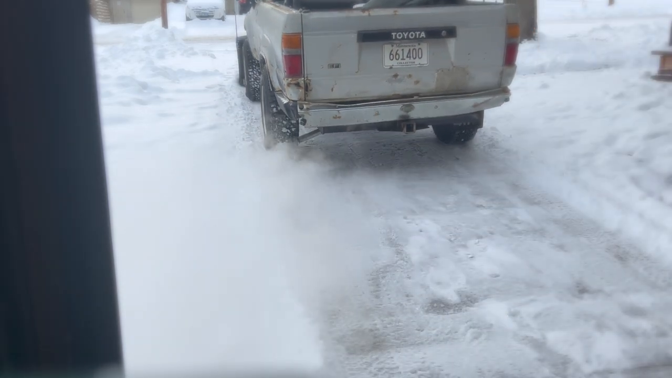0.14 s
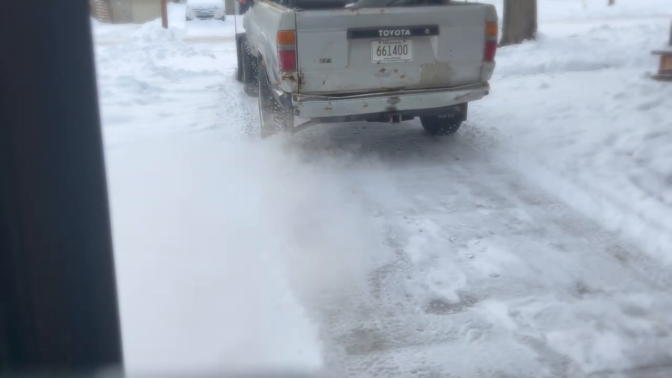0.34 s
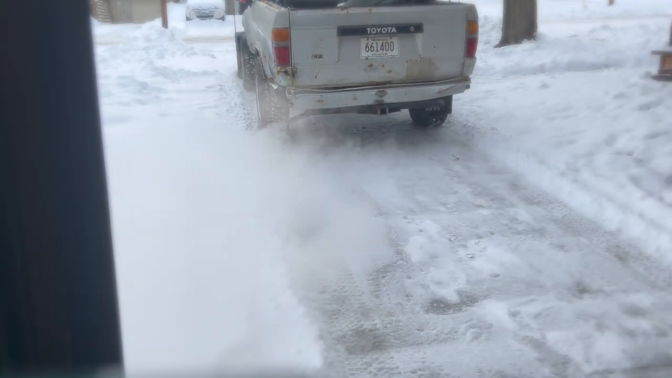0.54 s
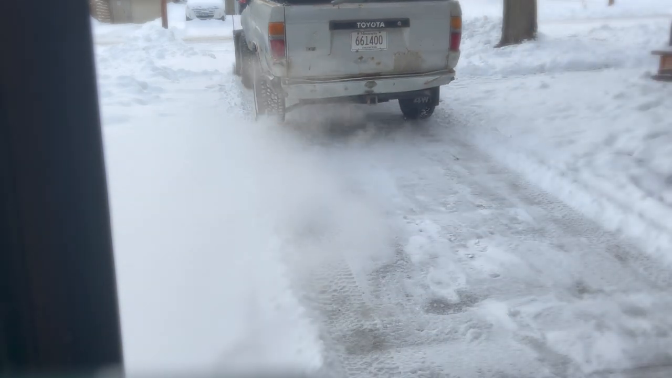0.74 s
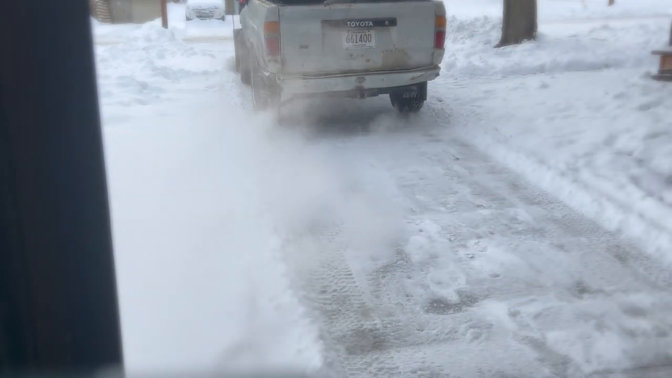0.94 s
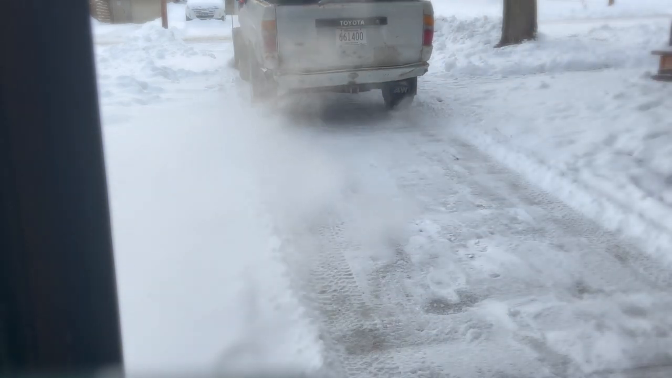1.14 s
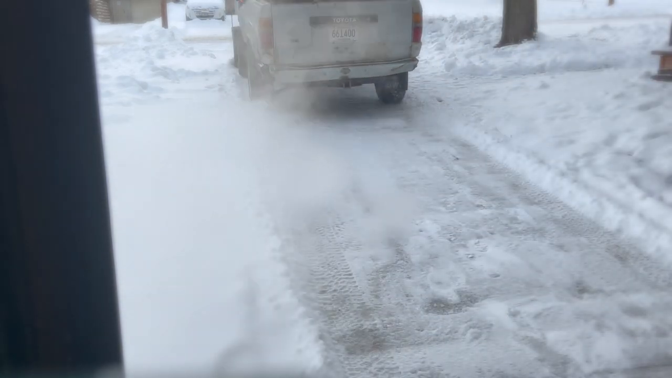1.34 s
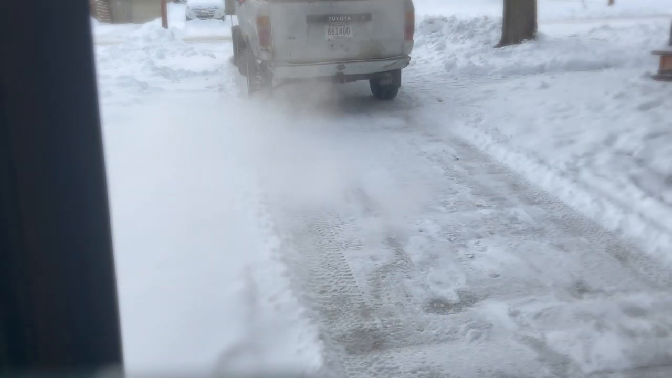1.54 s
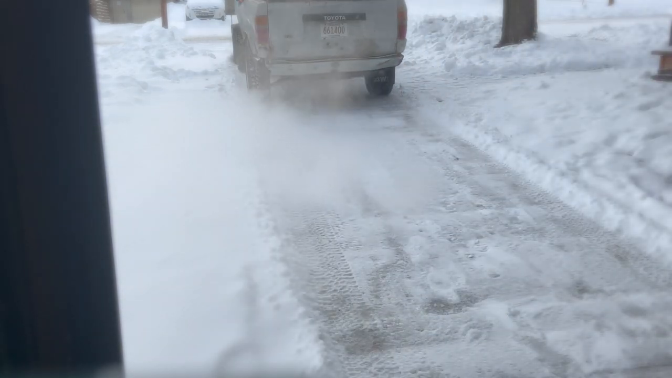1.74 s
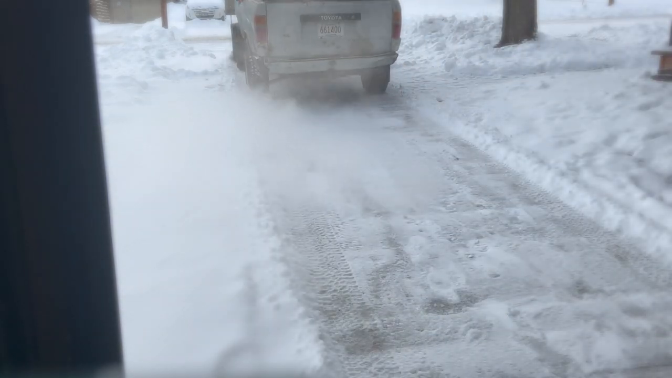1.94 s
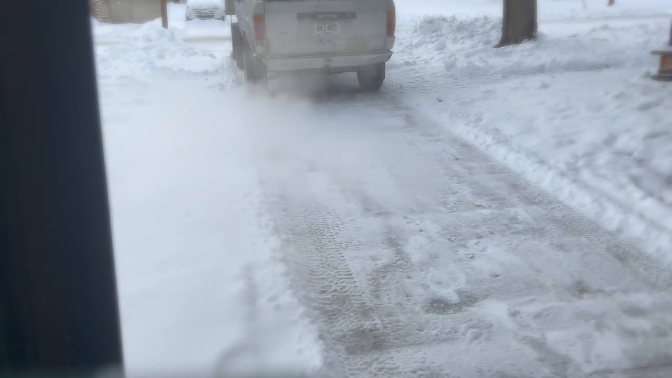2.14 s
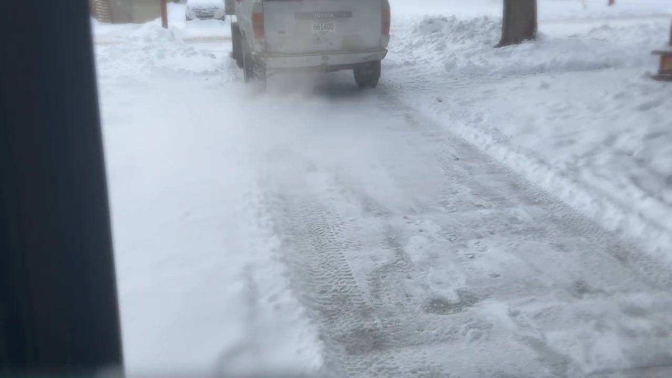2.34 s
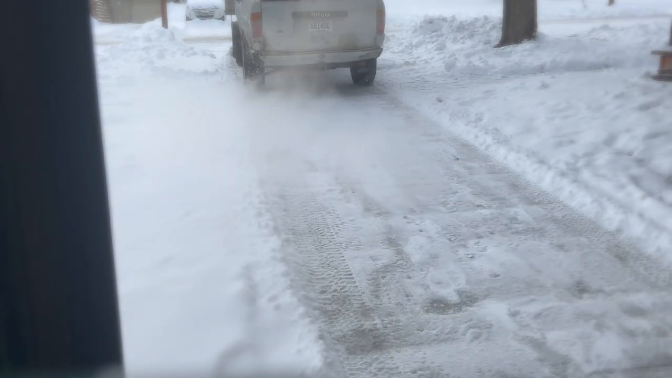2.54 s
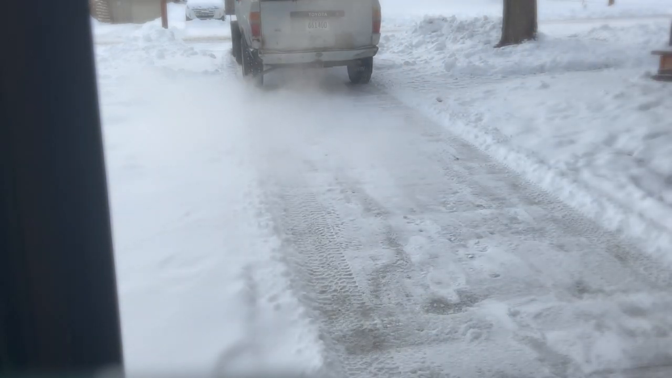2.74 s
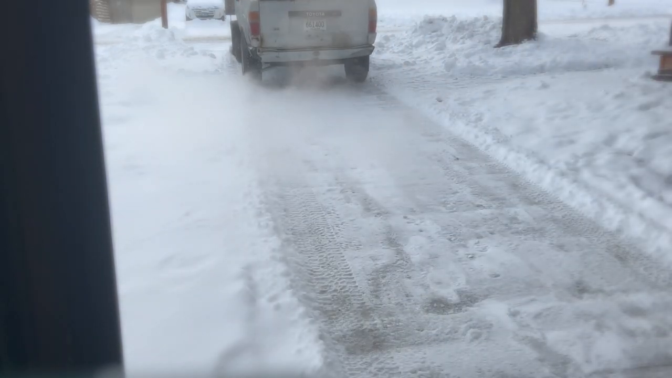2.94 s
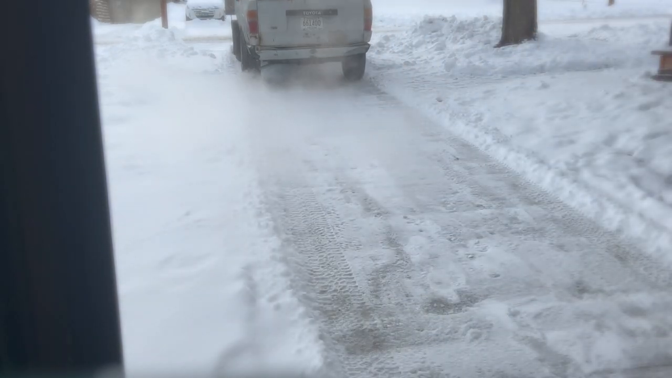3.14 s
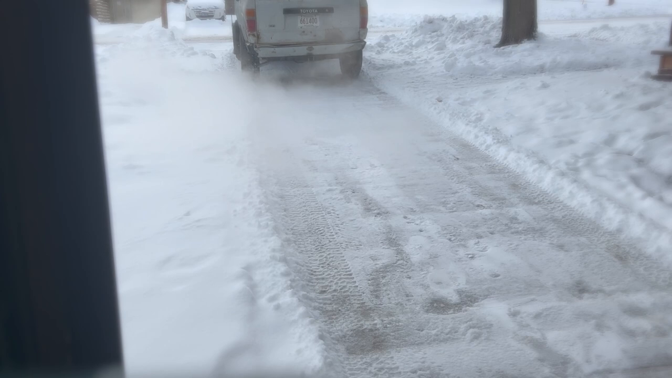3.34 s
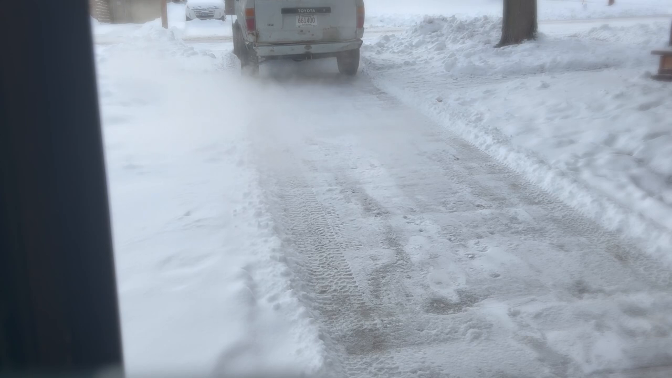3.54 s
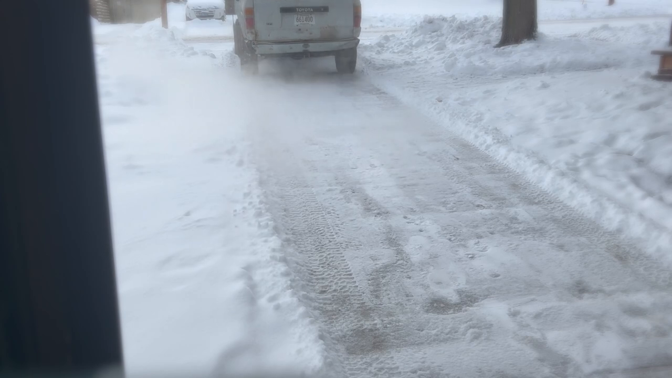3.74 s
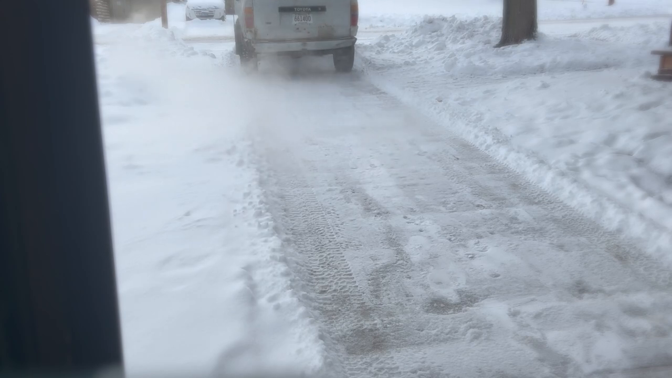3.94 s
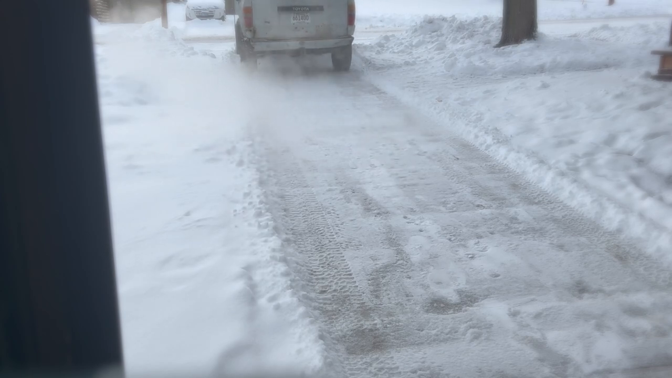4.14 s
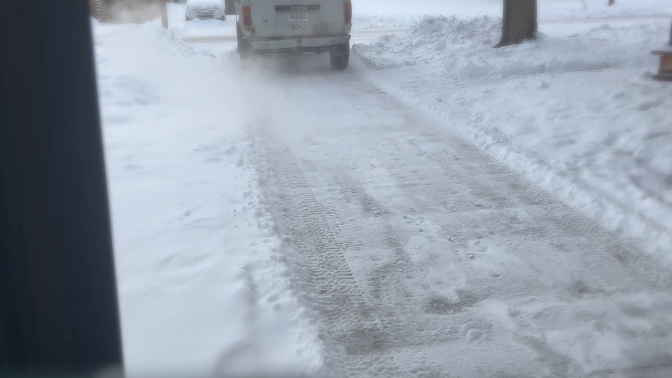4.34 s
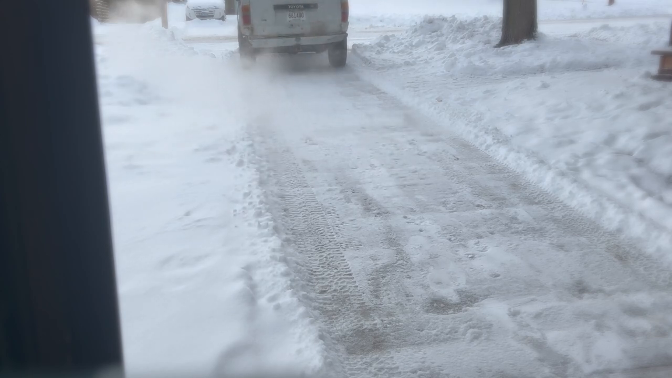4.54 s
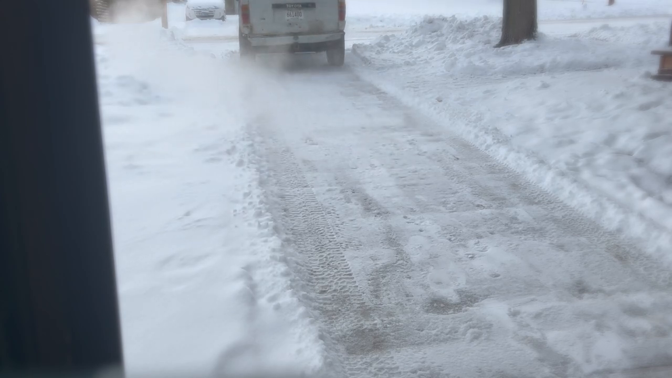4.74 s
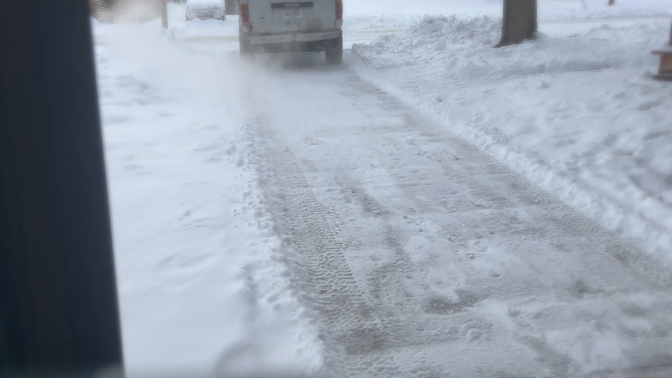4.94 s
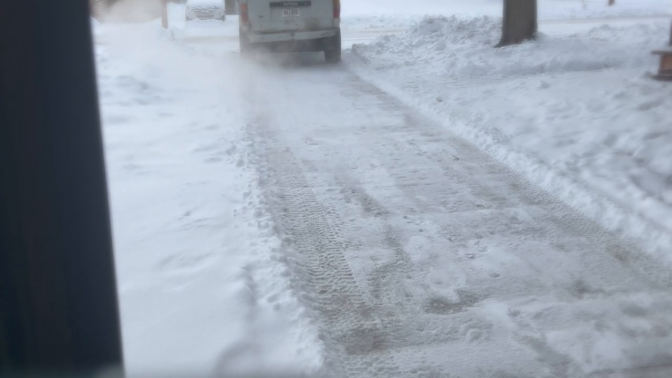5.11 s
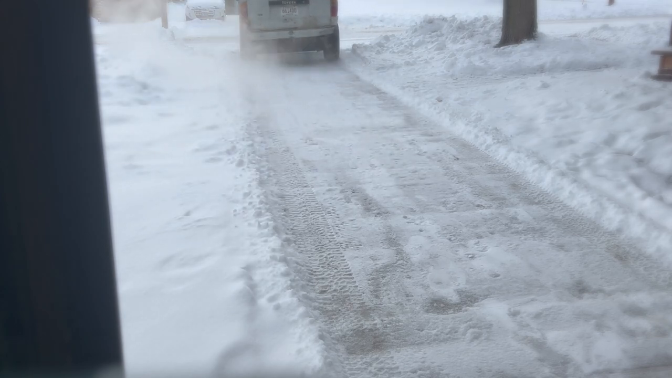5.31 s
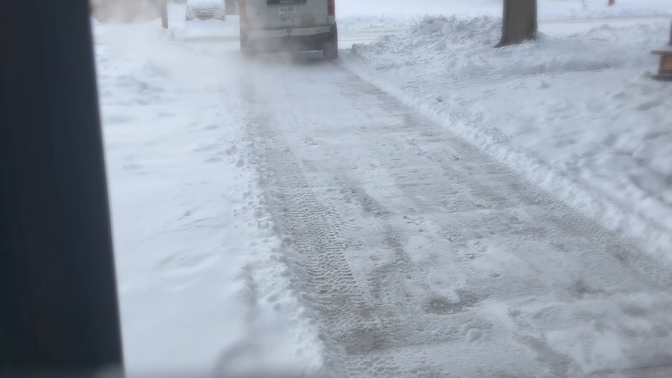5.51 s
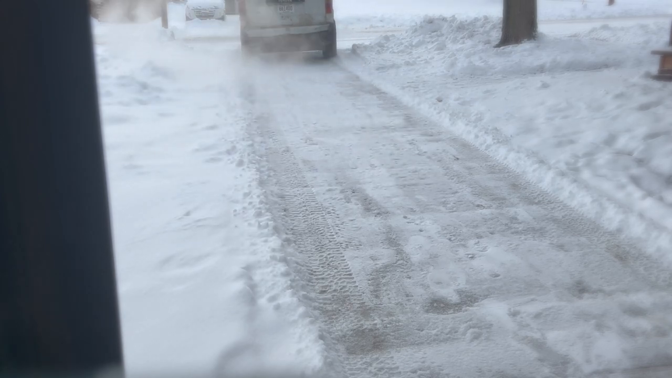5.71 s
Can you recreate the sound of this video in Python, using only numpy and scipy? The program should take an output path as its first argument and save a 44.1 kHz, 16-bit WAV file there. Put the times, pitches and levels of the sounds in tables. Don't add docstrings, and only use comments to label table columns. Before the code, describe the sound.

A small four-cylinder engine knocks and hums through its exhaust, briefly bogs down, then pulls again at a lower pitch than at first. Snow crumbles under the tyres in irregular patches while the load bed knocks and the body bounces. Open snowy driveway, close handheld stereo microphone, dry sound with soft hiss from gas and fan.

```python
import sys
import numpy as np
from scipy import signal
from scipy.fft import rfft, irfft, next_fast_len
from scipy.io import wavfile
from scipy.ndimage import uniform_filter1d

SR = 44100
rng = np.random.default_rng(int(sys.argv[2]) if len(sys.argv) > 2 else 0)


def master_out(mix):
    frames = np.transpose(np.atleast_2d(mix))
    ceiling = np.clip(frames, -1, 1)
    pcm = np.round(ceiling * 32767).astype(np.int16)
    wavfile.write(sys.argv[1], SR, pcm)


def to_linear_factor(level_db):
    exponent = np.asarray(level_db, float) / 20
    return 10 ** exponent


N = 254456
SIZE = next_fast_len(N)
TIME = np.arange(N) / SR
FREQ = np.fft.rfftfreq(SIZE, 1 / SR)
MID_LOAD_DB = -53


def curves(table):
    s, *columns = np.transpose(table)
    return [np.interp(TIME, s, c) for c in columns]


def unit(x):
    return x / np.sqrt(np.mean(x ** 2))


def noise():
    return rng.standard_normal((2, N))


def colour(x, spectrum):
    hz, db = np.transpose(spectrum)
    gain = to_linear_factor(np.interp(np.log(FREQ + 1), np.log(hz), db))
    return irfft(rfft(x, SIZE) * gain, SIZE)[..., :N]


def ring(x, hz, width_hz):
    return signal.lfilter(*signal.iirpeak(hz, hz / width_hz, fs=SR), x)


def modes(x, table):
    return sum(to_linear_factor(db) * ring(x, hz, width_hz) for hz, width_hz, db in table)


def walk(rate):
    hold = int(SR / rate)
    steps = np.repeat(rng.standard_normal(N // hold + 1), hold)
    return unit(uniform_filter1d(uniform_filter1d(steps, hold), hold)[:N])


def burst(s, decay_s, rise_s):
    span = slice(int(s * SR), min(int((s + .3) * SR), N))
    age = np.maximum(TIME[span] - s, 0)
    return span, age, (1 - np.exp(-age / rise_s)) * np.exp(-age / decay_s)


def rings(table, rise_s, gain_db, decay_s):
    out = np.zeros((2, N))
    for s, db, hz in table:
        span, age, shape = burst(s, decay_s, rise_s)
        out[0, span] += to_linear_factor(db + gain_db) * shape * np.sin(2 * np.pi * hz * age)
    return out


def swells(rows):
    return sum(to_linear_factor(db) * np.exp(-2 * ((TIME - s) / max(length_s, .01)) ** 2) for s, db, length_s in rows)


# centre in seconds, level in dB,
# length in seconds.
PANEL_SQUEAKS = [(.06, -54, 0.11), (.172, -45.5, 0.019), (.198, -44, 0.015), (.27, -56, .012),
                 (.35, -58, .07), (.55, -59, 0.24), (4.82, -60, .1)]
# start in seconds, peak in dB, pitch in Hz.
ENGINE_PINGS = [(.138, -43, 2200), (.402, -43, 2900), (.492, -41, 2050), (.622, -45, 2980), (.8, -36, 2890),
                (2.6702, -45, 3110), (2.6963, -53.5, 2930), (2.7457, -45, 2870), (2.796, -42, 2890),
                (2.8189, -40, 3040), (2.8439, -46, 2180), (2.8938, -44, 3090), (3.167, -42, 2920),
                (4.509, -45, 2200), (5.0557, -45, 2200)]
# start in seconds, peak in dB, pitch in Hz.
BED_KNOCKS = [(1.461, -38, 470), (1.613, -41, 500), (2.877, -42, 557), (3.119, -50, 453), (3.173, -38, 633),
              (3.388, -34, 390), (3.615, -41, 693), (4.198, -44, 427)]
# start in seconds, peak in dB, pitch in Hz.
BODY_BOUNCES = [(0.164, -41, 75.4), (0.27, -45, 136), (0.309, -45, 76), (0.34, -35, 136), (0.669, -31, 76),
                (1.598, -23.5, 62.5), (2.199, -29, 75.4), (2.579, -42, 72), (2.719, -21, 73),
                (3.12, -30, 61.6), (3.17, -32, 70), (3.849, -35, 72.84), (4.209, -49, 75.8),
                (4.259, -21, 63.5), (4.289, -20, 64), (4.389, -43, 74.6), (4.719, -36, 71)]


def rattles():
    hz, width_hz = 1030, 24
    rough = unit(ring(ring(noise(), hz, width_hz), hz, width_hz))
    note = np.sin(2 * np.pi * hz * TIME + 0.49 * walk(27.7))
    song = to_linear_factor(-5) * rough + [[np.sqrt(2)], [0]] * note
    pings = rings(ENGINE_PINGS, rise_s=0.00076, gain_db=1.6, decay_s=0.005)
    knocks = rings(BED_KNOCKS, rise_s=0.00055, gain_db=-0.7, decay_s=0.014)
    bounces = rings(BODY_BOUNCES, rise_s=0.016, gain_db=-1.2, decay_s=0.023)
    return swells(PANEL_SQUEAKS) * song + pings + knocks + bounces


# start in seconds, peak in dB, ring in Hz.
WHEEL_DROPS = [(0.154, -24, 214), (0.321, -40, 180), (0.411, -44, 178), (0.553, -38, 248),
               (0.594, -35, 251), (1.068, -32, 210), (2.154, -29.5, 244.8), (2.456, -34, 188.9),
               (2.594, -26, 232), (2.876, -39, 241), (3.106, -28, 187), (3.236, -23, 192),
               (3.381, -30, 177.6), (3.495, -30, 205), (3.543, -35, 204.3), (3.589, -29.5, 272),
               (3.977, -29.5, 208.3), (4.198, -28.5, 276), (4.25, -26.5, 180), (4.664, -29.5, 265),
               (4.764, -31, 214), (4.84, -27, 178), (4.901, -33, 208), (4.969, -26.5, 213),
               (5.365, -27, 207), (5.551, -29, 242), (5.672, -25, 252)]


def bumps():
    out = np.zeros((2, N))
    hiss = unit(colour(noise(), SNOW_COLOUR))
    thump_hz = BODY_MODES[0][0]
    for s, db, hz in WHEEL_DROPS:
        span, age, crack = burst(s, .022, 0.021)
        ringing = burst(s, 0.011, 0.01)[2] * np.sin(2 * np.pi * hz * age)
        thump = burst(s, 0.025, 0.006)[2] * np.sin(2 * np.pi * thump_hz * age)
        out[:, span] += to_linear_factor(db - 6.0) * crack * hiss[:, span]
        out[0, span] += to_linear_factor(db + 2.0) * ringing + to_linear_factor(db - 27) * thump
    return out


# time in seconds, level in dB.
SNOW_DEPTH = [(0, -44), (.9, -45.5), (1.55, -51), (2.35, -53), (3.3, -46), (4.1, -55.5), (4.5, -54),
              (5, -47), (5.77, -44)]
# centre in seconds, crunch in dB, length in seconds,
# rumble minus crunch in dB.
CRUST_PATCHES = [(0.024, -52.5, 0.097, 6), (0.17, -62, 0.087, 13), (.34, -55.5, 0.059, 16.5),
                 (0.583, -58, 0.094, 3), (0.957, -56, 0.049, 9), (1.112, -66.5, 0.14, 23),
                 (1.414, -64.5, 0.12, 16), (1.62, -59, 0.021, -7), (2.2, -56, 0.075, 9),
                 (2.582, -46.5, 0.15, 2), (2.878, -53, 0.04, -11), (3.127, -53.5, 0.04, 9),
                 (3.28, -66, 0.054, 15), (3.39, -54, 0.12, 7), (3.502, -44.5, 0.02, -3),
                 (3.645, -49, 0.081, 4), (3.794, -57, 0.079, 7), (3.9, -48, 0.069, 5),
                 (3.97, -66, 0.055, 19), (4.208, -51, 0.019, 11), (4.284, -44.5, 0.066, 3),
                 (4.62, -55, 0.069, 8.5), (4.772, -61, 0.054, 21), (4.88, -51.5, 0.046, 7.5),
                 (5.125, -61.5, 0.13, 15.5), (5.36, -55.5, 0.13, 13.5), (5.585, -56, 0.041, 11),
                 (5.737, -53, 0.089, -2)]


def crush():
    depth_db, = curves(SNOW_DEPTH)
    crunch = swells([(s, db, length_s) for s, db, length_s, _ in CRUST_PATCHES])
    rumble = swells([(s, db + low_db, length_s) for s, db, length_s, low_db in CRUST_PATCHES])
    return to_linear_factor(depth_db) + crunch, to_linear_factor(depth_db + 2.5) + rumble


# pitch in Hz, level in dB.
SNOW_COLOUR = [(25, -28), (45, 4), (125, -0.5), (160, -4.5), (220, -1.5), (340, -14.5), (550, -8.5),
               (780, -14), (1050, -13), (1350, -16.5), (1650, -31), (4000, -26), (16000, -47.5)]
# pitch in Hz, width in Hz, level in dB.
BODY_MODES = [(67.9, 15.6, 6), (105.2, 20.4, 0.5), (187, 9.2, -4), (220, 21.3, -9), (268, 47, -16.5)]


def tyres(load_db, snow, rumble):
    size = to_linear_factor(2.5 * np.minimum(rng.exponential(size=N), 4))
    grains = (rng.random(N) < 900 / SR) * size
    grains = uniform_filter1d(grains, size=150) * to_linear_factor(1.8 * walk(12))
    crunch = colour(noise() * (0.69 + unit(grains) * .5), SNOW_COLOUR)
    tread = signal.sosfiltfilt(signal.butter(2, 320, fs=SR, output="sos"), crunch)
    boom = unit(modes(noise() * to_linear_factor(1.38 * walk(15)), BODY_MODES))
    engine_shake = to_linear_factor(-41 + 0.31 * (load_db - MID_LOAD_DB))
    shake = np.hypot(engine_shake, to_linear_factor(3) * snow)
    upper = snow * to_linear_factor(-3.6) * unit(crunch - tread)
    lower = rumble * to_linear_factor(0.61 * walk(15)) * unit(tread)
    return upper + lower + to_linear_factor(-3.5) * shake * boom


# pitch in Hz, width in Hz, level in dB.
BLOCK_MODES = [(1368, 69, 3.5), (2182, 180, 3.5), (2750, 200, -5.5), (3000, 214, 2), (4337, 320, -3),
               (5870, 22, 0), (7440, 130, -33)]
# pitch in Hz, level in dB.
GAS_COLOUR = [(700, -7.5), (1500, 1.5), (2500, -1.5), (3600, -4.5), (5200, -34), (7000, -6.5),
              (10500, -10.5), (11300, -13.5), (12600, -24.5), (16000, -24)]


def clatter(turns, hz, load_db, snow):
    turns = turns + .034 * (hz - 38.5)
    count = turns.astype(int)
    age = turns % 1 / hz
    chance = rng.standard_normal((count[-1] + 1, len(BLOCK_MODES) + 1)).T
    knock = (1 - np.exp(-age / 0.0027)) * np.exp(-age / 0.0078)
    knock = unit(to_linear_factor(1.5 * chance[0][count]) * knock)
    strike = np.diff(count, prepend=count[0]) * to_linear_factor(28.5) * [[1], [0]]
    strike = np.roll(strike, int(.002 * SR), axis=1)
    block = np.zeros((2, N))
    for (mode_hz, width_hz, db), luck in zip(BLOCK_MODES, chance[1:]):
        luck = luck[count]
        rough = noise() * (0.47 + 0.63 * knock * to_linear_factor(1.1 * luck))
        edge = strike * np.sign(luck) * to_linear_factor(3 * (abs(luck) - 1.0))
        block += to_linear_factor(db) * ring(rough + edge, mode_hz, width_hz)
    gas = unit(colour(noise() * (1 + 0.39 * knock) * to_linear_factor(0.63 * walk(9)), GAS_COLOUR))
    top = signal.sosfilt(signal.butter(2, 5500, "high", fs=SR, output="sos"), gas)
    fan = to_linear_factor(-62.5 + 0.75 * (load_db - MID_LOAD_DB))
    spray = to_linear_factor(-17) * snow
    hiss = np.hypot(fan, spray) * to_linear_factor(1.3 * walk(11))
    return to_linear_factor(load_db) * (to_linear_factor(-3.5) * unit(block) + to_linear_factor(-0.5) * (gas - top)) + to_linear_factor(10.5) * hiss * top


# pitch in Hz, width in Hz, level in dB.
PIPE_MODES = [(44.2, 8, -35), (64.5, 6, -43.5), (76.1, 6.5, -41.5), (90.5, 13.2, -35), (112.3, 10, -36),
              (136, 7.9, -38.5), (180, 60, -51)]
PIPE_SWING = [1, -1, -1, 1, -1, 1, -1]
MULTIPLES_DB = [-1, -1, -6.5, -6.5]


def pipe(hz):
    gain = 0
    for sign, (centre_hz, width_hz, db) in zip(PIPE_SWING, PIPE_MODES):
        gain = gain + sign * to_linear_factor(db) / (1 + (2 * (hz - centre_hz) / width_hz) ** 2)
    return gain


def exhaust(turns, hz, load_db):
    climb = np.maximum(np.gradient(hz) * SR, 0)
    pull_db = 0.08 * uniform_filter1d(climb, size=SR // 10) + 0.19 * (load_db - MID_LOAD_DB)
    drone = np.zeros(N)
    for k, db in enumerate(MULTIPLES_DB):
        level = pipe((k + 1) * hz) * to_linear_factor(db + pull_db + 1.4 * walk(4.6))
        phase = 2 * np.pi * (k + 1) * turns + 1.51 * k - .45 + 0.17 * walk(9)
        drone += level * np.sqrt(2) * np.sin(phase)
    shell = to_linear_factor(-56.5) * unit(ring(noise(), 217, 3.1))
    return np.array([drone, 0 * drone]) + shell


# pitch in Hz, lead of the left in radians, likeness from 0 to 1,
# left minus right in dB.
PORT_PAIR = [(50, 0, 1, 0), (100, 0, .84, .5), (300, 0, .86, -2.5), (750, 0, .55, -3), (1600, 1.1, .6, 0),
             (2300, .1, .96, .5), (3300, -.2, .84, -1), (4300, -.3, .84, -2), (5100, -1, .45, -2),
             (5500, 2.3, .62, -2.5), (6500, 2.5, .75, -1), (7200, 3.14, .93, 0), (9350, 6.28, .9, 0),
             (15900, 12.6, .85, 0)]


def ports(shared, apart):
    hz, *columns = np.transpose(PORT_PAIR)
    lead, alike, pan_db = (np.interp(FREQ, hz, c) for c in columns)
    mid = rfft(shared, SIZE) * np.sqrt((1 + alike) / 2)
    side = rfft(apart, SIZE) * np.sqrt((1 - alike) / 2)
    tilt = to_linear_factor(pan_db / 2) * np.exp(.5j * lead)
    return irfft(np.array([(mid + side) * tilt, (mid - side) / tilt]), SIZE)[:, :N]


# time in seconds, firing rate in Hz.
ENGINE_REVS = [(0, 43.75), (.3, 45.22), (.6, 45.2), (.88, 44.85), (1, 40.21), (1.22, 33.1), (1.5, 30.45),
               (1.75, 35.45), (2, 37.88), (2.3, 38.72), (2.65, 40.32), (3.2, 40.15), (3.55, 38.6),
               (4.15, 38.21), (4.5, 39.09), (4.85, 38.34), (5.3, 37.57), (5.77, 38.09)]
# time in seconds, level in dB.
THROTTLE = [(0, -49.5), (.25, -48.5), (.78, -48.5), (1, -55.5), (1.2, -62.5), (1.53, -59.5), (1.74, -52),
            (2.4, -52.5), (2.57, -50), (3, -52.5), (3.1, -51.5), (4.12, -54.5), (4.3, -52), (5.1, -54),
            (5.77, -54.5)]


def scene():
    hz, = curves(ENGINE_REVS)
    load_db, = curves(THROTTLE)
    snow, rumble = crush()
    turns = np.cumsum(hz) / SR
    engine = exhaust(turns, hz, load_db) + clatter(turns + .87, hz, load_db, snow)
    return ports(*(engine + tyres(load_db, snow, rumble) + bumps() + rattles()))


# pitch in Hz, level under the other in dB.
STEREO_DROP = [(2000, -30), (2400, -11), (4600, -10), (5200, -12), (6500, -8.5), (7200, -8), (7900, -5),
               (8600, -2), (10000, -3), (10700, -5), (12000, -2.5), (13500, -2.5), (14200, -4), (15000, -3)]


def joint_stereo(x):
    frame = dict(fs=SR, window="cosine", nperseg=2048, noverlap=1024)
    hz, _, pair = signal.stft(np.array([x[0] + x[1], x[0] - x[1]]) / 2, **frame)
    edges = np.r_[320 / 1.1 ** np.arange(16, 0, -1), np.arange(320, 1024, 32)]
    band = np.searchsorted(edges, np.arange(len(hz)), "right")
    lines = np.bincount(band)
    power = np.array([np.sum(abs(pair[:, band == b]) ** 2, axis=1) for b in range(band[-1] + 1)])
    other = power[:, ::-1]
    drop_db = np.interp(np.bincount(band, hz) / lines, *np.transpose(STEREO_DROP), left=-99)
    strong = power > other * to_linear_factor(2 * drop_db)[:, None, None]
    floor = other * (to_linear_factor(2 * (drop_db - 4.5)) / lines)[:, None, None]
    keep = strong[band].transpose(1, 0, 2) & (abs(pair) ** 2 > floor[band].transpose(1, 0, 2))
    keep = keep & (hz < 15770)[:, None]
    mid, side = signal.istft(pair * keep, **frame)[1][:, :N]
    return np.array([mid + side, mid - side])


def low_pass(x):
    return signal.sosfilt(signal.butter(12, 15900, fs=SR, output="sos"), x)


def record(dry):
    dry = signal.sosfilt(signal.butter(2, 30, "high", fs=SR, output="sos"), dry)
    mix = joint_stereo(dry)
    return low_pass(mix)


dry = scene()
out = record(dry)
master_out(out)
```